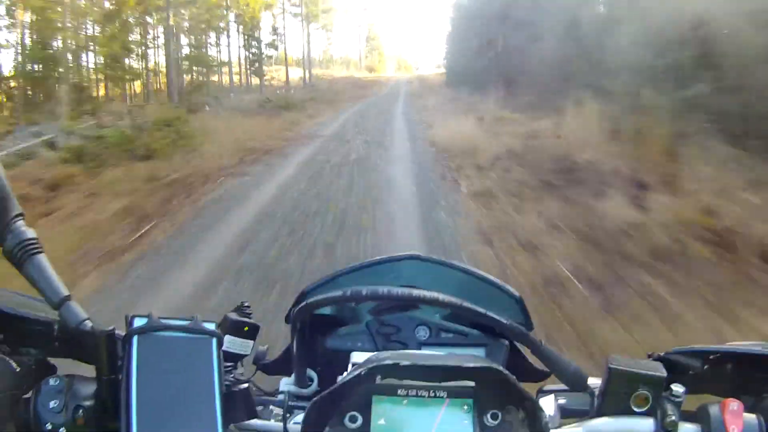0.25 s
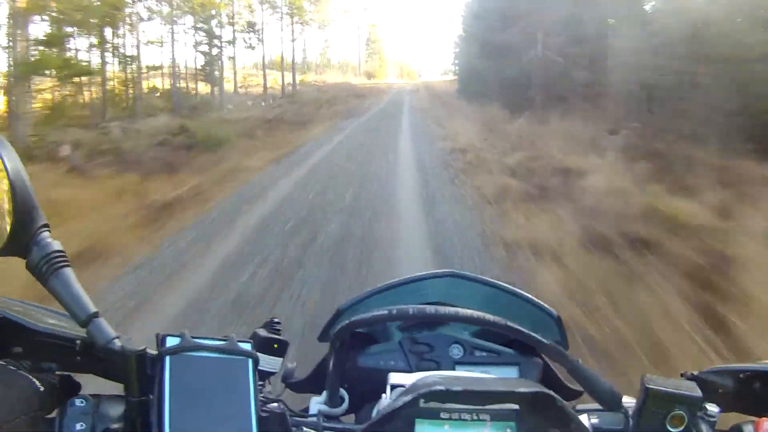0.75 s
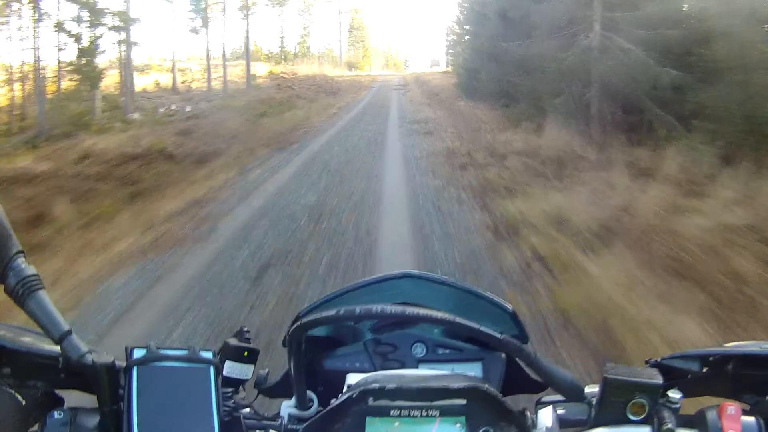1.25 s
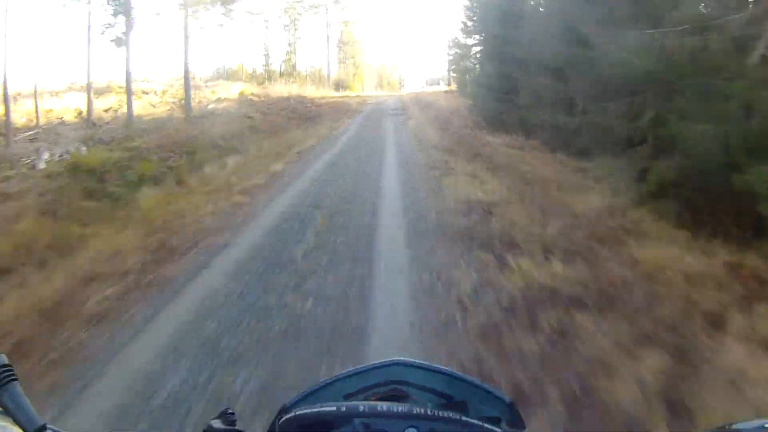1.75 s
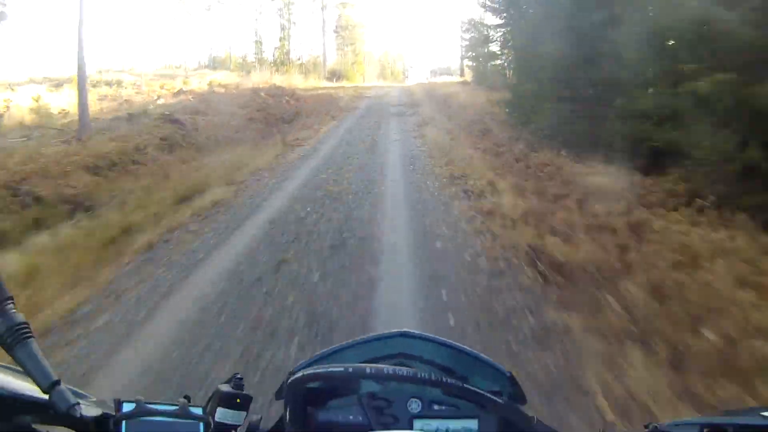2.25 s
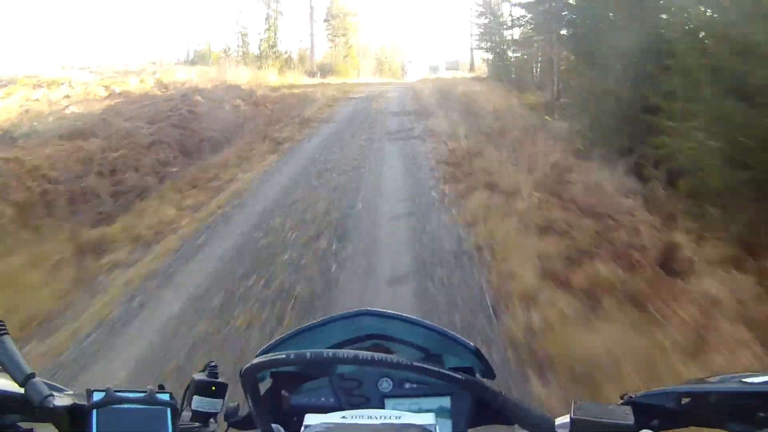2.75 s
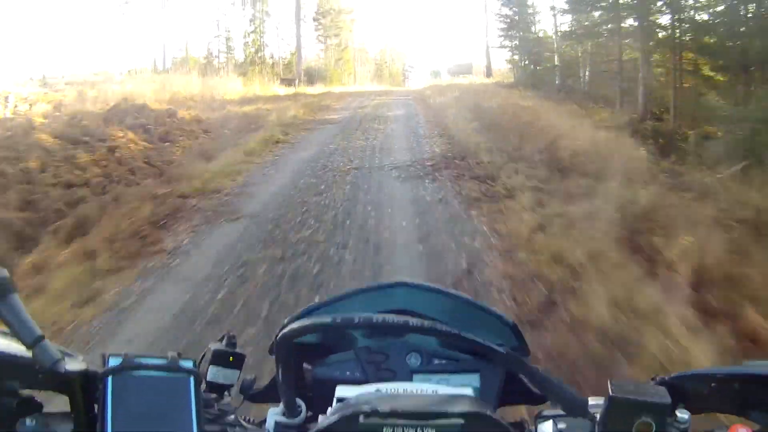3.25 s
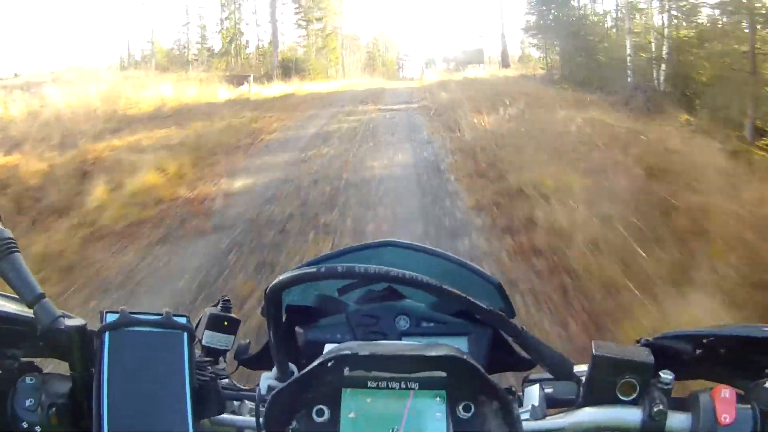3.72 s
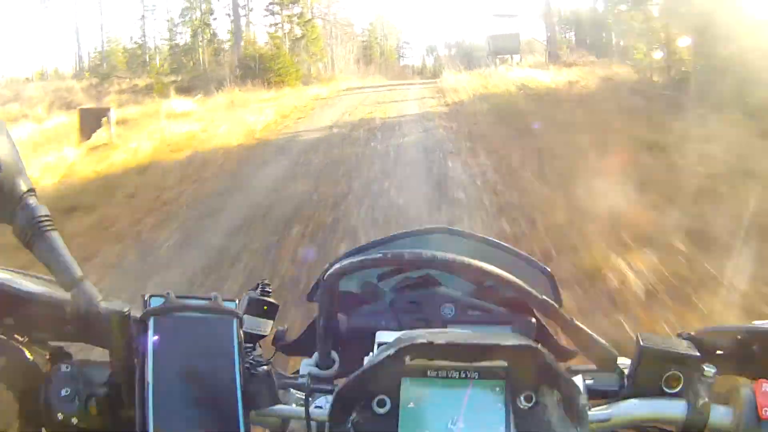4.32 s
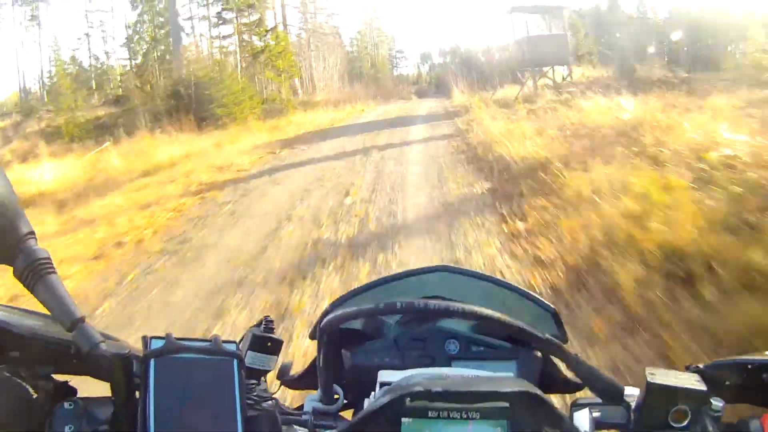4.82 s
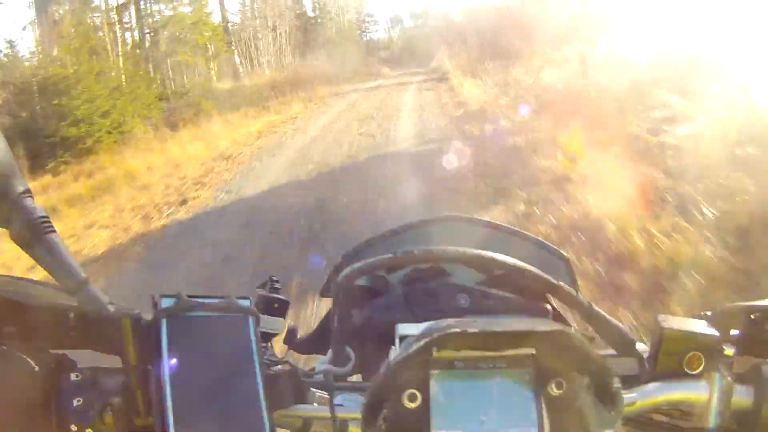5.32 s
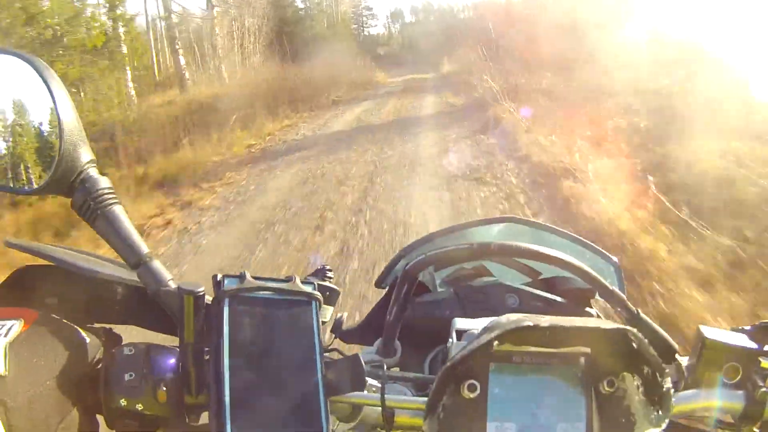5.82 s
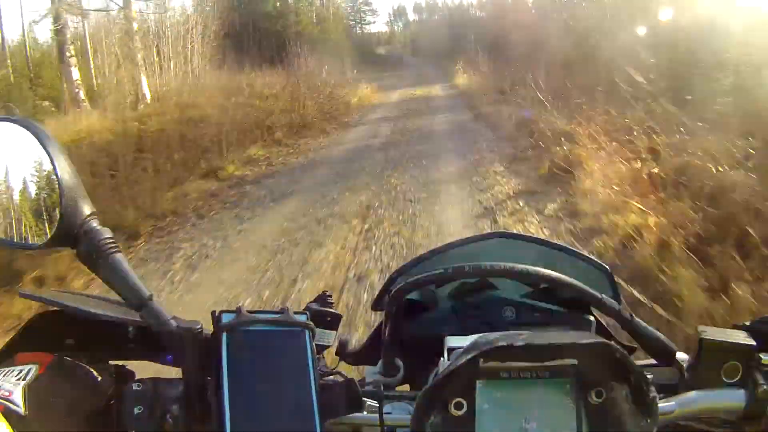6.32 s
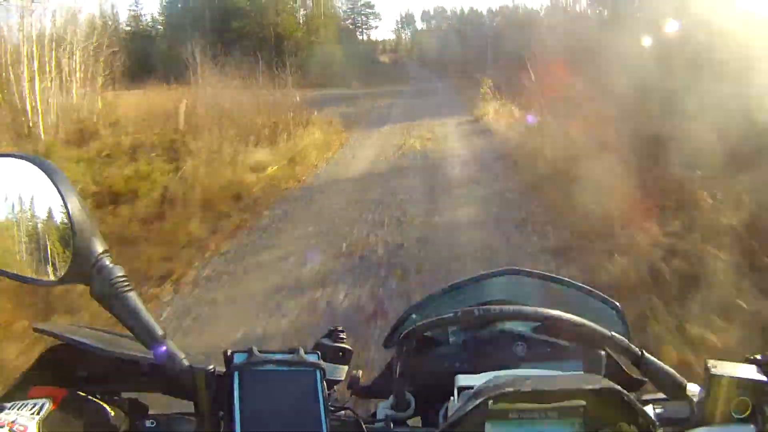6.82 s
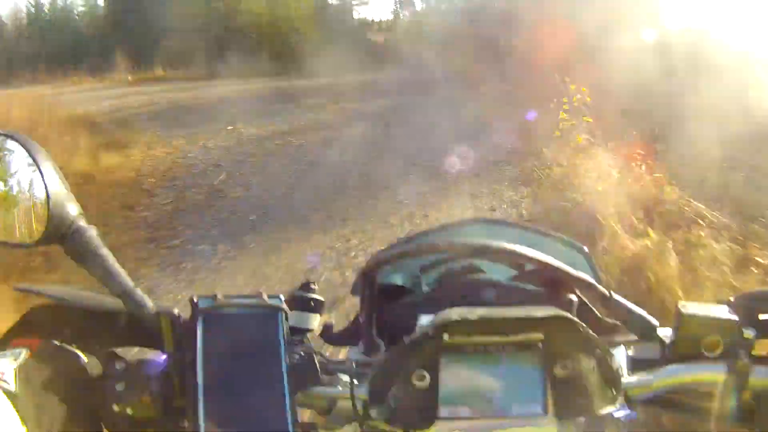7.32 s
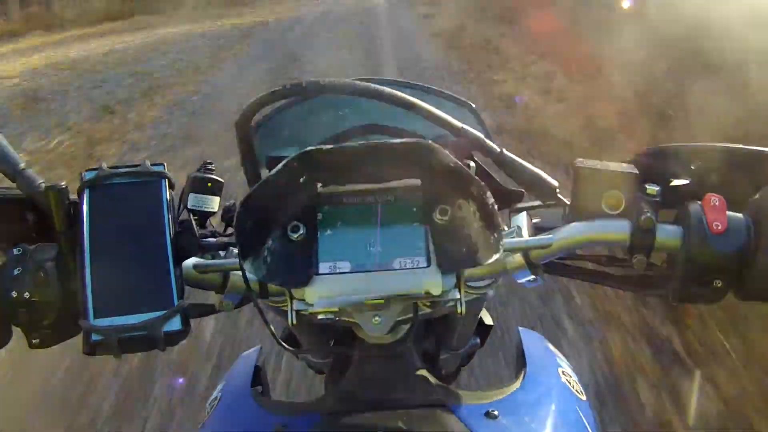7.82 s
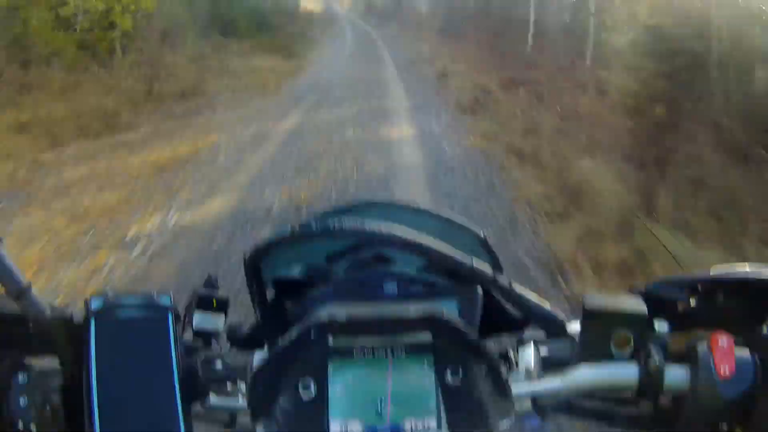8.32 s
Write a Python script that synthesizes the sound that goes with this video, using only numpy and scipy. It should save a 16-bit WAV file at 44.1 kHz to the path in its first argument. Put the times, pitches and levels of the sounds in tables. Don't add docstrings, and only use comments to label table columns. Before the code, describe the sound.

Continuous muffled wind roar and airy hiss on a moving motorcycle, outdoors on a gravel forest road, heard from a helmet-mounted enclosed microphone. The engine is a low, even, rapid throb that makes the hiss flutter. A soft rut thud comes early, a lull in the middle, then stronger gusts, a quick crackle of grit, deep jolts and one hard tick.

```python
import sys
import numpy as np
from scipy import signal
from scipy.fft import rfft, irfft, next_fast_len
from scipy.io import wavfile
from scipy.ndimage import uniform_filter1d

SR = 44100
rng = np.random.default_rng(int(sys.argv[2]) if len(sys.argv) > 2 else 0)


def generate_wav(sig):
    pcm = np.round(np.clip(np.atleast_2d(sig).T, -1, 1) * 32767).astype(np.int16)
    wavfile.write(sys.argv[1], SR, pcm)


def elevation(decibels):
    levels = np.asarray(decibels, float)
    return 10 ** (levels / 20)


N = 377496
T = np.arange(N) / SR
LENGTH = next_fast_len(N)
HZ = np.fft.rfftfreq(LENGTH, 1 / SR)


def unit(x):
    return x / np.sqrt(np.mean(x ** 2))


def curves(table):
    s, *columns = np.transpose(table)
    return [np.interp(T, s, c) for c in columns]


def walk(rate_hz):
    k = 16
    held = np.repeat(rng.standard_normal(int(N / SR * rate_hz) + 2), k)
    slewed = uniform_filter1d(uniform_filter1d(held, k), k)
    return np.interp(T * rate_hz * k, np.arange(len(held)), unit(slewed))


def add(out, start_s, sound):
    i = int(start_s * SR)
    out[i:i + len(sound)] += sound[:N - i]


# start_s, tilt [1 = looking down]
HEAD_TILT = [(0, -0.36), (1.15, -0.27), (1.3, -0.37), (2.1, -0.69), (2.25, -.9), (2.9, -0.83),
             (3.05, -0.91), (3.62, .3), (3.72, -.9), (4.3, -0.25), (4.45, -0.19), (5.3, -0.18),
             (6.7, -0.09), (7.3, -0.033), (7.45, 0.99), (8.3, 1.), (8.45, 0.14)]


def turbulence(modes, level_db, gust_db, gust_hz, flicker_db, flicker_hz):
    out = 0
    (tilt,) = curves(HEAD_TILT)
    eddies = rng.standard_normal(len(HZ)) + 1j * rng.standard_normal(len(HZ))
    for k, (mode_hz, width_hz, mode_db, tilt_db) in enumerate(modes):
        response = 1 / (1 + ((HZ - mode_hz) / (width_hz / 2)) ** 2)
        own_eddies = np.roll(eddies, k * len(HZ) // len(modes))
        ring = irfft(own_eddies * response, LENGTH)[:N]
        out = out + ring * elevation(mode_db + tilt_db * tilt + flicker_db * walk(flicker_hz))
    return unit(out * elevation(gust_db * walk(gust_hz))) * elevation(level_db)


# start_s, helmet_eddies_db, housing_airflow_db
HEADWIND = [(0, 3, 1.5), (1.05, 1.5, 3), (1.3, 3.9, -2), (1.95, 1, -0.5), (2.45, -5.5, -5), (2.95, -5, -1),
            (3.55, -1, -0.5), (3.75, -8, -1.5), (4.15, -2.5, -4.5), (4.5, 2, -1.5), (4.9, -2, -1.9),
            (5.3, 2.5, 1), (6, 0, 0.5), (6.6, -1.5, 1.3), (7.25, 2.5, 1.5), (7.6, 4.5, 4.5), (8, 3, 1.5),
            (8.35, 5, 3.5)]


def blown(steady_db, per_eddy_db, per_flow_db):
    eddies_db, flow_db = curves(HEADWIND)
    return steady_db + per_eddy_db * eddies_db + per_flow_db * flow_db


def swells(table):
    s, length_s, *more_db = np.transpose(table)
    return more_db @ np.exp(-((T - s[:, None]) / (length_s[:, None] / 2)) ** 2)


# mode_hz, width_hz, level_db, head_down_db
MIC_NOISE = [(12300, 4000, 0, 0.), (15000, 3000, -2, 0.)]


def self_noise():
    return turbulence(MIC_NOISE, -65.5, gust_db=.5, gust_hz=9, flicker_db=.3, flicker_hz=5)


# start_s, level_db, pitch_hz, t60_s
RUTS = [
    (1.349, -18, 103, .2),
    (6.899, -15, 240, .1),
    (7.491, -16, 51.3, 0.16),
    (7.704, -8, 210, 0.07),
    (8.21, -13, 52.2, 0.14),
]


def thuds():
    out, t = np.zeros(N), T[:SR // 2]
    for start_s, level_db, pitch_hz, t60_s in RUTS:
        push = np.minimum(t * pitch_hz / 0.36, 1)
        swing = np.sin(2 * np.pi * pitch_hz * t) * elevation(-60 * t / t60_s)
        add(out, start_s, elevation(level_db) * push * swing)
    return out


# start_s, level_db, ring_hz, ring_t60_s, crack_db
GRAINS = [
    (6.321, -32, 5250, .012, -12),
    (6.3313, -21.5, 5000, 0.013, -13),
    (6.3358, -25, 5500, 0.02, -9),
    (6.3385, -23, 2480, 0.014, -15),
    (6.348, -11.5, 4950, .013, -15),
    (6.3505, -21, 5330, .009, -12),
    (7.6206, -12.5, 4500, .012, -8.5),
]


def grit():
    out, t = np.zeros(N), T[:SR // 20]
    crack_low_hz, crack_t60_s, rise_s = 6000, .009, .0003
    for start_s, level_db, ring_hz, ring_t60_s, crack_db in GRAINS:
        decay = elevation(-60 * t / ring_t60_s)
        neighbour = 0.67 * np.sin(2 * np.pi * 1.22 * ring_hz * t) * decay
        ring = np.sin(2 * np.pi * ring_hz * t) + neighbour
        crack_top_hz = max(24000 + 800 * crack_db, 1.5 * crack_low_hz)
        band = signal.butter(1, [crack_low_hz, crack_top_hz], "bandpass", fs=SR, output="sos")
        crack = signal.sosfilt(band, rng.standard_normal(len(t))) * elevation(crack_db - 60 * t / crack_t60_s)
        add(out, start_s, elevation(level_db) * (np.minimum(t / rise_s, 1) * ring * decay + crack))
    return out


# start_s, turns_hz, hum_db
CRANK_SPEED = [(0, 54.3, -44), (.7, 55.7, -47), (1.35, 53.8, -36), (1.8, 52.1, -41), (2.3, 50, -35),
               (2.9, 51.54, -41), (3.6, 52.07, -41), (4.3, 49.45, -35.5), (5.3, 49.4, -37.5),
               (5.9, 49.4, -41), (6.7, 51.44, -40), (7.2, 52.1, -41), (7.55, 53.16, -29), (7.95, 53.9, -41),
               (8.56, 53.7, -39)]
# start_s, level_db
GEAR_WHINE = [
    (1.1, -70),
    (1.45, -41),
    (3.1, -41),
    (4.1, -44),
    (4.7, -70),
]


def engine():
    turns_hz, hum_db = curves(CRANK_SPEED)
    turns = np.cumsum(turns_hz * (1 + .002 * walk(8))) / SR
    angle = 2 * np.pi * turns
    hum = np.sin(angle) + elevation(-13) * np.sin(angle / 2) + elevation(-10) * np.sin(2 * angle)
    whine = np.sin(13 * angle / 2) * elevation(curves(GEAR_WHINE)[0] + walk(5))
    knock = np.exp(-(turns / 2 % 1) / .12)
    return np.sqrt(2) * (hum * elevation(hum_db + 1.2) + whine), knock


# mode_hz, width_hz, level_db, head_down_db
WHISTLE_MODES = [(2068, 250, -5.5, -0.5), (2238, 227, -0.5, 0), (2525, 336, 0.5, 2.5),
                 (2724, 330, -12, 1.5)]
HISS_MODES = [(4370, 370, 4.5, 0.91), (4743, 500, 1.5, -0.27), (5250, 460, -0.5, -0.4),
              (5850, 680, 0, -0.63), (6360, 450, -9.5, -0.15), (6800, 500, -13.5, 0.)]
SIZZLE_MODES = [(7540, 1800, 1, -2), (7900, 900, -4.5, 8), (9250, 1300, -2, 0.5), (10070, 630, -1, -2),
                (10700, 870, -4, 1), (12900, 4000, -11, 3)]
# start_s, length_s, whistle_db, hiss_db
AIR_PUFFS = [(.55, 0.13, 2, 0), (2.4, .25, 0, -2), (3.25, 0.24, -2, 1.5), (3.56, 0.097, 3, 2),
             (4.82, .12, -0.5, -.5), (5.1, 0.16, 2, -0.5), (6.34, 0.03, 1, 6.5), (6.75, .15, 1.5, 0),
             (8.2, 0.098, 1, 0), (8.56, 0.22, -3.5, -1.5)]


def housing_wind():
    whistle_db, hiss_db = swells(AIR_PUFFS)
    whistle = turbulence(WHISTLE_MODES, blown(-38.5, 0.093, 0.56) + whistle_db,
                         gust_db=0.78, gust_hz=11, flicker_db=0.23, flicker_hz=9)
    hiss = turbulence(HISS_MODES, blown(-39, .05, 0.58) + hiss_db,
                      gust_db=0.73, gust_hz=9.2, flicker_db=0.34, flicker_hz=9)
    sizzle = turbulence(SIZZLE_MODES, blown(-57, -.1, 0.66) + .4 * hiss_db,
                        gust_db=0.33, gust_hz=10, flicker_db=.7, flicker_hz=7)
    return whistle + hiss, sizzle


# mode_hz, width_hz, level_db, head_down_db
SWAY_MODES = [(14, 14, -2, 0.), (30, 18, 0, 1.)]
RUMBLE_MODES = [(106.8, 33, 4.5, -0.5), (75.6, 51, -6, -4), (140.6, 55, -3.5, 2.5)]
BOOM_MODES = [(185, 117, -7, 4), (219.6, 52.4, -2, -1.3), (257, 64, 1, -0.15), (327, 110, -13, -2.2),
              (432.7, 90, -14, -0.2)]
ROAR_MODES = [(610, 99, 2, 0.), (747, 120, -3, -2), (850, 146, 0, -1), (1020, 560, -7.5, 0),
              (1514, 240, -7.5, -1), (1765, 580, -11.5, 2), (3060, 220, -19.5, 2), (3467, 390, -13.5, 2),
              (3930, 350, -9.5, 1.5)]
# start_s, length_s, rumble_db, boom_db
EDDY_SLAPS = [(.31, 0.12, 3.5, -0.5), (1.38, 0.074, 8, -3.5), (1.86, 0.21, 1.5, 0.5), (2.26, 0.12, 5, 2.2),
              (3.5, 0.16, -1, -1), (3.8, 0.6, 6, 2), (4.39, 0.085, 1, .1), (4.598, .12, -8, 2.2),
              (5.17, 0.12, 4.5, 2.5), (5.39, 0.077, 2.1, 2.5), (5.55, 0.11, -2, 3.5),
              (5.68, 0.17, -3.5, 0.5), (6.233, 0.096, 5, 5.5), (6.94, 0.24, 0.5, 2), (7.7, 0.065, 6.5, 4.5),
              (7.85, 0.14, 1, 1), (8.06, 0.11, 5, -1.8), (8.419, 0.045, -.1, 2), (8.56, 0.13, -2, -5)]


def helmet_wind(knock):
    rumble_db, boom_db = swells(EDDY_SLAPS)
    sway = turbulence(SWAY_MODES, -37., gust_db=1.0, gust_hz=2.33, flicker_db=.5, flicker_hz=3.05)
    rumble = turbulence(RUMBLE_MODES, blown(-31, 0.5, 0.081) + rumble_db,
                        gust_db=0.21, gust_hz=22, flicker_db=0.88, flicker_hz=13.0)
    boom = turbulence(BOOM_MODES, blown(-26, 0.65, .05) + boom_db,
                      gust_db=0.35, gust_hz=14, flicker_db=0.14, flicker_hz=6.7)
    roar = turbulence(ROAR_MODES, blown(-38, 0.3, 0.23),
                      gust_db=1.0, gust_hz=12, flicker_db=0.55, flicker_hz=6)
    throb = elevation(2.0 * uniform_filter1d(knock, size=300))
    return sway + rumble + boom * throb + roar


def scene():
    road = thuds() + grit()
    hum, knock = engine()
    housing, sizzle = housing_wind()
    rattled = housing * elevation(2.5 * knock) + (sizzle + self_noise()) * elevation(4.5 * knock)
    return (road + hum + rattled + helmet_wind(knock))[None]


def top_cut(x):
    return signal.sosfilt(signal.butter(12, 16480, fs=SR, output="sos"), x)


def record(dry):
    top_hz = 15730
    mix = irfft(rfft(dry, LENGTH) * (HZ < top_hz), LENGTH)[:, :N]
    return top_cut(mix)


dry = scene()
out = record(dry)
generate_wav(out)
```